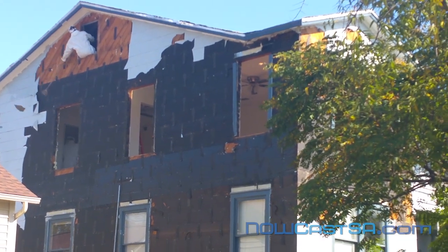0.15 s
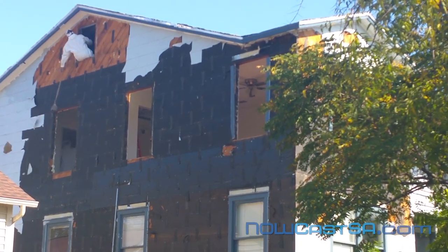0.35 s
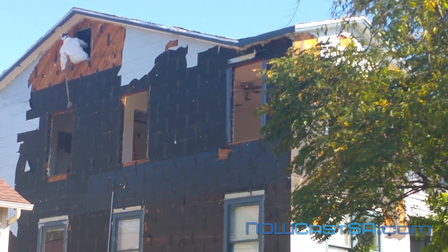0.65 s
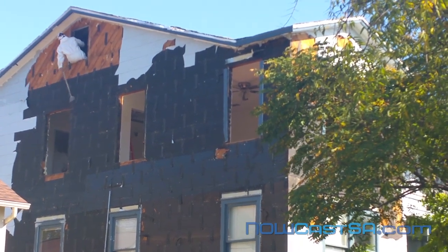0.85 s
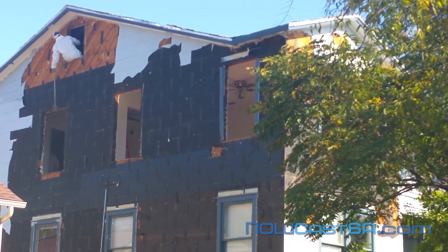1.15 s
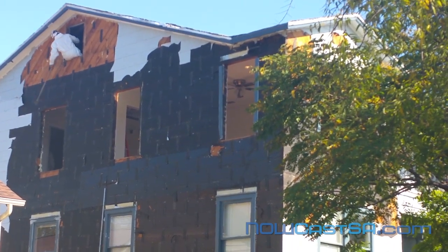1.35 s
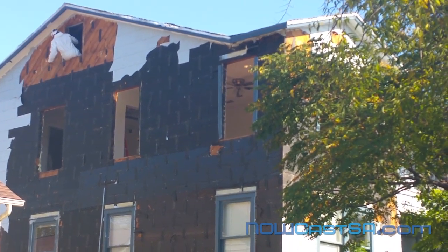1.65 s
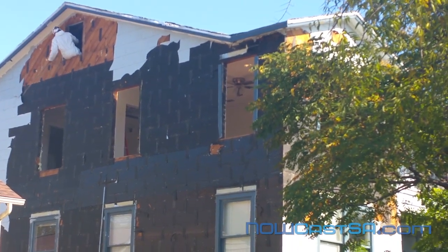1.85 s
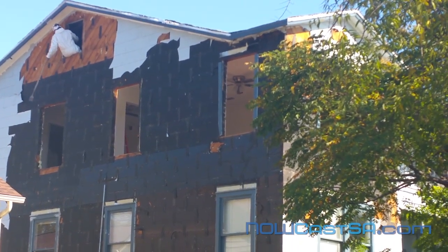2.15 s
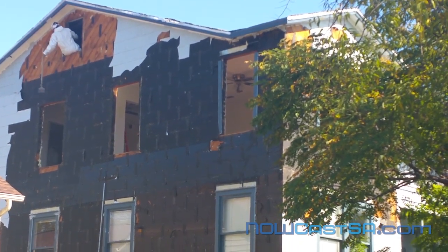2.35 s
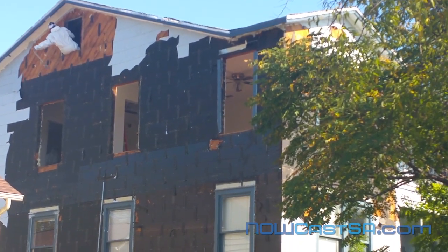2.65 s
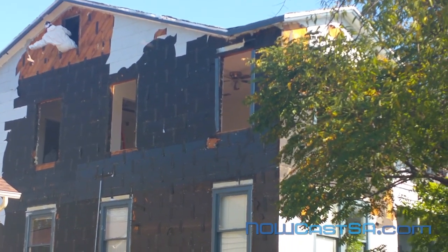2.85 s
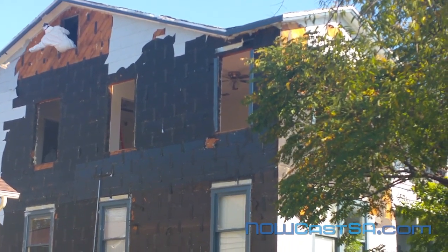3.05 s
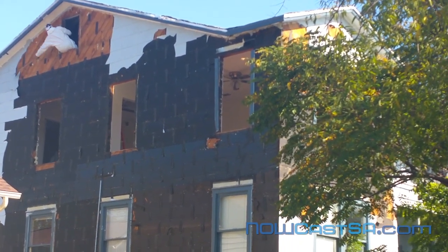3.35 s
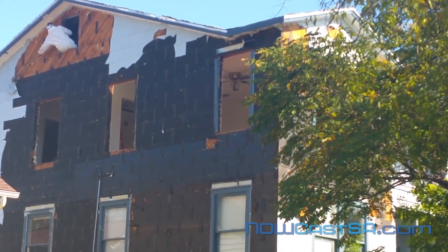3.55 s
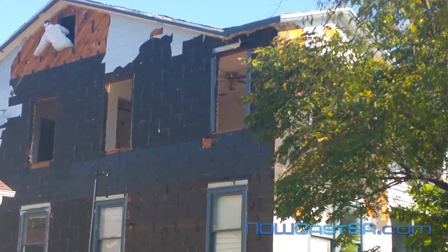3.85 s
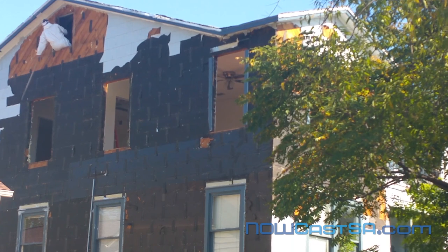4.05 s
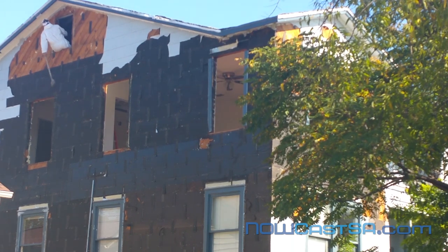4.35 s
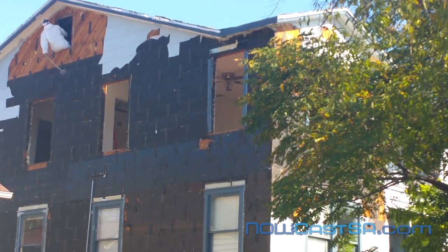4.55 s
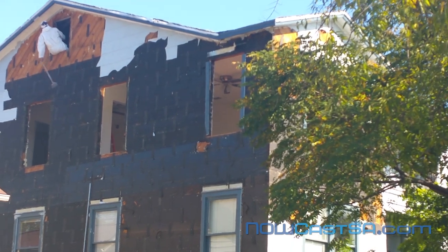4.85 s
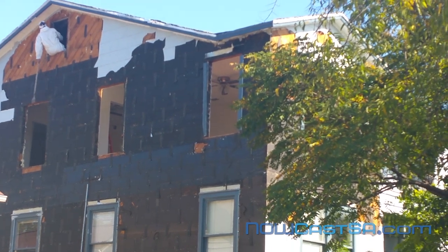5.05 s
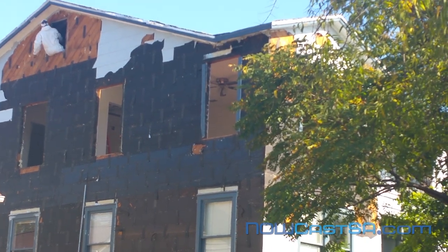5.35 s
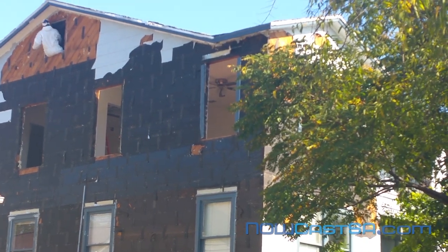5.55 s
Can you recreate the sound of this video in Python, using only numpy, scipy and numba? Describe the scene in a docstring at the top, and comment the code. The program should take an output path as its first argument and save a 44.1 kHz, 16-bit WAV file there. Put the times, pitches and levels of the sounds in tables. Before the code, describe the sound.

Hard shingles smash in uneven bursts in a yard, their shards clinking and tumbling over a faint traffic and engine hum.

```python
"""A yard, across from a house wall: brittle cement shingles are knocked off and shatter on the ground.
Each fall is a shower of shards, each a damped ring, then a tumbling heap and trickling crumbs.
A whole shingle and single chips ring, dust sizzles, heavy loads thud; the yard's walls answer.
Far traffic and a faint engine sink under the crashes. A thin hiss stays; a breathy band swells at the end."""
import sys
import numpy as np
from scipy import signal
from scipy.fft import rfft, irfft, next_fast_len
from scipy.io import wavfile
from scipy.ndimage import uniform_filter1d, map_coordinates
from numba import njit

SR = 44100
rng = np.random.default_rng(int(sys.argv[2]) if len(sys.argv) > 2 else 0)


def log_audio(samples):
    """Write samples as a 16-bit WAV file to the path given in sys.argv[1]."""
    # one column per channel
    frames = np.atleast_2d(samples).T
    # limit to full scale, then quantise
    limited = np.clip(frames, -1, 1)
    pcm = np.round(limited * 32767).astype(np.int16)
    wavfile.write(sys.argv[1], SR, pcm)


N = 252187

# Impacts and cracks. Each row: start in seconds, middle pieces in dB, big pieces and splinters
# in dB relative to those, middle pitch in Hz.
IMPACTS = [(0.0275, -22, -13, -36, 2110), (0.0478, -12, -18.5, -44, 1540), (.058, -7.5, -44, -39, 1510),
           (0.2305, -19.5, -38, -7, 2940), (0.2473, -16.5, -19.5, -13.5, 2990),
           (0.3186, -46, -15, -6.5, 1760), (0.361, -31.5, -37, -39, 3270), (.822, -37, -11, -38, 2570),
           (1.0472, -5.5, -33, -14, 2020), (1.1274, -16.5, -8, -10, 1510),
           (1.2303, -12.5, -22, -15.5, 2530), (1.4396, -5, -32, -12.5, 1830), (1.4844, -10, -33, -32, 1600),
           (1.7115, -27, -8, -31, 2500), (1.7624, -36.5, -8, -13.5, 2860), (2.0463, -36.5, -2, -14, 2250),
           (2.2008, -49, -6, -4, 2900), (2.3815, -14, -42, -10, 1555), (2.4051, -26, -49.5, 2, 1435),
           (2.8024, -49, -10, 5.5, 2300), (3.3388, -38.5, -19, -40, 1550), (3.5427, -3.5, -12, -19, 1560),
           (3.5778, -11, -11, -26, 1810), (3.6755, -12, -8.5, -29, 2040), (3.7631, -18.5, -24, -36, 2040),
           (3.8694, -45, 0, -39, 1500), (4.4367, -42, -1, -9, 1840), (4.6837, -20, -33, 4.5, 2430),
           (4.7005, -13.5, -33, -6.5, 2970), (4.7455, -13, -16, -21.5, 2117),
           (4.9821, -54.5, -25, -27, 2540), (5.1937, -11.5, -32, -13, 1920), (5.2154, -19, -41, -27, 2610)]
# Big, middle, splinter. Each row: nominal pitch in Hz, spread in octaves, nominal cycles to -40 dB,
# shower gain in dB, factor on shower t60.
SHARD_SIZES = [(599, 0.4, 7, 10, 1.05), (2216, 0.466, 10.5, -5, .95), (6630, 0.54, 63, 1, .8)]
# Tumbling rubble, one table a heap. Each row: time in seconds, middle pieces, big pieces and
# splinters in dB, middle pitch in Hz.
HEAPS = [
    [(0.06, -70, -40, -43, 1500), (0.07, -26.5, -43, -56, 1510), (0.098, -53, -49, -83, 1530),
     (0.138, -64, -72, -78, 1760), (0.16, -44, -64, -55, 1880)],
    [(0.25, -3, -50, -35, 2410), (0.26, -27, -49, -27.5, 2540), (0.272, -28, -58, -29, 2420),
     (0.3, -49, -57, -54, 2460), (0.312, -45, -73, -56, 2380), (0.326, -44, -56, -41, 2230),
     (0.34, -47, -72, -57, 2170)],
    [(0.37, -42, -44, -45, 2240), (0.382, -36.5, -36, -48, 2220), (0.414, -39.5, -39, -53, 2230),
     (0.448, -51, -63, -59, 2420), (0.456, -46, -59, -65, 2480), (0.52, -56, -69, -64, 2060)],
    [(0.83, -73, -47, -72, 2500), (0.834, -39, -44, -123, 2400), (0.876, -49, -40, -79, 2340),
     (0.896, -47.5, -46, -76, 2230), (0.934, -46.5, -39, -96, 2000), (0.97, -59.5, -45, -78.5, 1900),
     (1.0, -65, -40, -73, 2050)],
    [(1.055, -16.5, -29, -28.5, 2020), (1.079, -20.5, -27, -22, 1950), (1.101, -16.5, -35, -23, 1910),
     (1.129, -18.5, -46, -22, 1870), (1.139, -23.5, -36, -31, 1800), (1.207, -29, -36, -37.5, 2200),
     (1.225, -38.5, -43, -40.5, 2220)],
    [(1.24, -19.5, -45, -28.5, 2010), (1.272, -23.5, -35, -25.5, 1930), (1.304, -9.5, -23, -22.5, 1823),
     (1.32, -16, -26, -21.5, 1920), (1.392, -40, -51, -47, 2300), (1.412, -39.5, -73, -57, 2240),
     (1.43, -31, -59, -52, 2180)],
    [(1.455, -11, -33, -20.5, 1746), (1.467, -11.5, -27, -18, 1704), (1.495, -25.5, -27.5, -21.5, 1830),
     (1.525, -16, -44, -27, 1870), (1.543, -27, -33, -28, 1780), (1.567, -30.5, -44, -35.5, 2160),
     (1.7, -33.5, -52, -46, 2800)],
    [(1.77, -43, -53, -61, 2760), (1.798, -37, -57, -45, 2420), (1.816, -32, -64, -50, 2270),
     (1.85, -38.5, -35.5, -72, 2600), (1.878, -42.5, -54, -51, 2700), (1.916, -39.5, -46, -54, 2610),
     (1.97, -65, -56, -71, 2700)],
    [(2.42, -53, -49, -24, 1450), (2.43, -50, -73, -47, 1520), (2.472, -32, -44, -63, 1720),
     (2.508, -28.5, -27, -55, 1555), (2.574, -46.5, -42.5, -66, 1820), (2.608, -38, -41, -68, 2280),
     (2.65, -60, -59, -62, 2470)],
    [(3.555, -23, -16, -30, 1920), (3.579, -12, -21, -24.5, 1894), (3.597, -24, -29, -31, 1870),
     (3.623, -20.5, -24, -35, 2030), (3.657, -33.5, -57, -45, 1840), (3.66, -26, -43, -45, 1840)],
    [(3.66, -35, -27, -43, 2320), (3.666, -25, -25, -42, 2360), (3.686, -25, -24.5, -43, 2350),
     (3.732, -36.5, -39, -48, 2000), (3.77, -26, -41, -46, 2270), (3.818, -54, -72, -68, 2010),
     (3.84, -41, -72, -63, 2030)],
    [(3.85, -60, -71, -65, 1570), (3.886, -47, -76.5, -62, 2500), (3.948, -51, -69, -62, 1860),
     (4.046, -53.5, -62, -62, 1480), (4.092, -55, -76, -64, 1550), (4.118, -54, -53, -70, 1610),
     (4.14, -59, -61, -83, 1540)],
    [(4.72, -45, -36, -26, 2400), (4.75, -21, -20.5, -26, 2200), (4.782, -16, -27.5, -24, 1890),
     (4.798, -25, -23, -22, 2100), (4.81, -12.5, -14.5, -25.5, 1950), (4.846, -16.5, -17, -21.5, 1900),
     (4.94, -35.5, -40, -49, 1930)],
    [(4.94, -43, -50, -56, 2360), (4.96, -30, -52, -56.5, 2600), (5.014, -44, -58, -40, 2560),
     (5.078, -33, -35, -38, 2460), (5.144, -48.5, -52, -45, 2360), (5.18, -75, -28, -75, 1840)],
    [(5.21, -21, -51, -35, 2220), (5.218, -22, -41, -33.5, 2200), (5.252, -31.5, -50, -36, 2080),
     (5.266, -34, -39, -57, 2090), (5.31, -43.5, -41, -71, 2270), (5.338, -52, -55, -70, 2470),
     (5.36, -41, -56, -63, 2410)],
    [(5.48, -62, -39, -73, 1380), (5.51, -50, -40, -63, 1380), (5.528, -51, -52, -63, 1390),
     (5.62, -43, -46, -51, 1740), (5.654, -48, -41, -72, 1540), (5.664, -58, -49, -74, 1490),
     (5.68, -57, -35, -81, 1470)],
]
# Trickling crumbs. Each row: time in seconds, middle pieces in dB, splinters in dB.
CRUMB_LEVELS = [(0.0, -47, -55), (0.19, -57, -64), (0.76, -63.5, -65.5), (1.1, -58, -60),
                (1.23, -25.5, -34), (1.43, -31, -45), (1.74, -43.5, -59), (2.05, -67, -66),
                (3.44, -61.5, -72.5), (3.74, -36.5, -60), (4.17, -74, -78), (4.73, -59, -67),
                (4.86, -38.5, -33), (5.06, -32, -52), (5.32, -52, -64), (5.72, -59, -75)]
# Modes of a whole shingle. Each row: frequency in Hz, level in dB, t60 in seconds.
SHINGLE_MODES = [(1449, 5.5, 0.091), (2000, -7.5, 0.061), (2167, -17, 0.059), (2576, -6, 0.15),
                 (3190, -6.5, 0.061), (3820, -11.5, 0.14), (4610, -20, 0.19), (6600, -45, 0.095),
                 (7450, -24.5, 0.085)]
# Strikes on it. Each row: start in seconds, level in dB.
SHINGLE_HITS = [(2.3863, -14), (2.4041, -14)]
# One-note chips. Each row: start in seconds, level in dB, pitch in Hz.
CHIP_NOTES = [(.014, -30, 365), (.0278, -25, 1845), (.0423, -31.5, 7670), (.0478, -12, 1500),
              (.0583, -16.5, 3440), (.0595, -28, 4480), (.0672, -20.5, 3320), (.0682, -9.5, 1524),
              (.2299, -21, 3010), (.2473, -31, 2200), (.834, -38.5, 2420), (1.1268, -17.5, 7130),
              (1.7983, -30.5, 2500), (1.7998, -29.5, 1890), (1.8577, -29.5, 3110), (1.9144, -29, 2516),
              (1.9599, -40, 3230), (2.0457, -40.5, 2100), (2.0457, -40.5, 3940), (2.0497, -39.5, 2845),
              (2.2009, -40.5, 3300), (2.2129, -45, 4800), (2.2194, -41.5, 3290), (2.8095, -34, 6950),
              (2.8928, -46, 4660), (2.8933, -47, 6860), (3.669, -20, 700), (3.869, -36, 660),
              (3.8816, -41, 2570), (3.907, -49, 6700), (4.0287, -49, 4840), (4.0482, -50, 4050),
              (4.4533, -43.5, 3730), (5.0449, -30, 5100), (5.0894, -31, 5210), (5.1934, -16, 1978),
              (5.3527, -38, 4680), (5.3762, -41, 4660), (5.3762, -43, 7400)]
# Thuds in the soil; treble rustles. Each row: start in seconds, hold in seconds, level in dB.
SOIL_THUDS = [(0.024, 0.035, -48.5), (1.3, .03, -52), (3.558, .04, -46), (4.81, 0.048, -40)]
HISS_RUSTLES = [(0.124, 0.053, -59), (0.197, 0.01, -55), (.28, .05, -50), (1.752, 0.023, -57),
                (2.8, 0.024, -61), (2.885, 0.035, -60), (3.977, 0.11, -62), (5.534, .11, -60)]
# Wall reverberation. Each row: frequency in Hz, t60 in seconds.
YARD_DECAY = [(300, 0.057), (2000, 0.17), (8000, 0.19), (15000, 0.027)]
# Far road. Each row: time in seconds, rumble in dB, tyres in dB.
TRAFFIC_LEVELS = [(0.0, -69, -68), (0.29, -55, -53), (0.59, -50, -59), (0.81, -66, -52), (1.05, -67, -53.5),
                  (1.31, -81, -48), (1.64, -53.5, -52.5), (1.88, -51, -48), (2.34, -52, -56),
                  (2.79, -70.5, -54.5), (3.41, -59, -51), (3.71, -66, -53.5), (4.14, -67, -52),
                  (4.47, -63, -54.5), (4.94, -48.5, -45.5), (5.72, -63, -48)]
# Engine swells. Each row: start in seconds, hold in seconds, note in dB, overtones in dB.
ENGINE_SWELLS = [(0, 0.093, -68, -51), (0.383, .4, -45.5, -73), (1.007, .05, -62, -77),
                 (1.245, 0.082, -48.5, -58), (1.657, 0.061, -45.5, -55.5), (1.842, 0.057, -46.5, -55),
                 (1.937, 0.425, -63, -50.5), (3.41, 0.084, -68, -67), (3.993, 0.16, -72, -63),
                 (4.955, .3, -56, -66)]
# Breathy band. Each row: time in seconds, level in dB, centre in Hz.
WHOOSH_PATH = [(5.3, -42, 1070), (5.36, -43, 1100), (5.42, -44, 1125), (5.5, -35.5, 1111),
               (5.62, -47, 1089), (5.64, -35, 1096), (5.68, -34.5, 976), (5.72, -33, 947)]
# Source spectra and microphone response. Each row: frequency in Hz, relative gain in dB.
SHARD_EQ = [(200, -18), (500, -10), (1000, -0.14), (2000, 3.5), (4000, 3.5), (7000, 1.5), (10000, -8.5),
            (15500, 0)]
DUST_EQ = [(7000, -41.5), (8500, 3.5), (10000, 1.5), (12500, -8), (15800, -15)]
SOIL_EQ = [(80, -42.5), (150, -7), (250, 3.5), (400, -5.5), (700, -43)]
RUMBLE_EQ = [(15, -64.5), (25, -40), (59, -3), (92, -11.5), (119, 0.5), (190, -8), (300, -3.5),
             (390, -21.5), (660, -120)]
TYRE_EQ = [(120, -17.5), (200, -3), (315, -4), (450, -6.5), (633, -5), (1350, -10), (1600, -5.5),
           (2520, -19.5), (6000, -59), (7800, -60.5), (13200, -120)]
HISS_EQ = [(1470, -35), (2500, -12.5), (2830, 5.5), (3060, -5), (3330, 1), (4930, -5), (5450, -9),
           (6610, 0.5), (8020, -14), (11300, -5.5), (14400, -18.5), (15800, -23.5)]
MIC_EQ = [(20, -19.5), (60, -10.5), (100, -0.5), (150, -0.5), (16000, -1)]
# Balance of shards and of far noise. Each row: frequency in Hz, left minus right in dB.
SHARD_PAN = [(60, 3.0), (95, 3.0), (150, 3.0), (240, -7.5), (380, 5.5), (600, -1.5), (950, 3), (1500, -1),
             (2380, 15), (3770, 5), (5980, -7), (9470, 8), (15000, 0)]
FAR_PAN = [(60, -4), (150, 4.5), (380, 2), (950, 11), (2380, 9), (5980, 4), (15000, 1)]
# Width of far noise. Each row: frequency in Hz, left-right correlation.
FAR_CORRELATION = [(60, 0.69), (180, 1), (550, 0.3), (1650, -0.37), (4970, 0.059), (15000, 0.12)]

SHOWER_RISE_S, SHOWER_T60_S, CHIP_T60_S = .0013, .12, .052
BIG_CRUMBS_DB, HISS_DB = -45, -68.5
DUST_GAIN_DB, DUST_DB_PER_DB = 0.5, 1.638
ENGINE_HZ, IDLE_NOTE_DB, IDLE_OVERTONES_DB = 162.5, -64, -68
DUCK_FROM_DB, DUCK_DB_PER_DB, DUCK_TAU_S = -34, 0.53, 0.057
TOP_HZ = 15850


def shatter(strikes=170, pieces=40):
    """Each impact throws pieces of three sizes that strike repeatedly as the shower thins."""
    start_s, db, big_db, splinter_db, middle_hz = np.transpose(IMPACTS)[:, :, None]
    out = 0
    shifts = (1, middle_hz / SHARD_SIZES[1][0], 1)
    for size, relative_db, shift in zip(SHARD_SIZES, (big_db, 0, splinter_db), shifts):
        hz, octaves, cycles, size_db, t60_factor = size
        which, when = rng.random((len(IMPACTS), strikes, 2)).transpose(2, 0, 1)
        scatter = np.maximum(rng.standard_normal((len(IMPACTS), pieces)), -1.2)
        piece_hz = hz * shift * 2 ** (octaves * scatter)
        strike_hz = np.take_along_axis(piece_hz, (which * pieces).astype(int), axis=1)
        t60_s = t60_factor * SHOWER_T60_S
        span_s = t60_s / 2 + SHOWER_RISE_S
        t = span_s * when ** 1.5
        rise_db = 20 * np.log10(1.02 - np.exp(-t / SHOWER_RISE_S))
        # Early strikes crowd, so each carries less level.
        spacing_db = 10 * np.log10(span_s * SR / strikes * 1.5 * np.sqrt(when + .02))
        decay_db = 60 * t / t60_s * (strike_hz / (hz * shift)) ** 0.15  # small pieces settle first
        level_db = db + relative_db + size_db + rise_db + spacing_db - decay_db
        out += shards(start_s + t, strike_hz, level_db, cycles, uneven_db=2)
    return out


def rubble(strikes=450, pieces=60):
    """Heaps tumble in clumps, pitch and size mix drifting; pieces ring longer than on impact."""
    out, clumps = 0, wobble(70)
    for column, (hz, octaves, cycles, *_) in zip((2, 1, 3), SHARD_SIZES):
        which, when = rng.random((2, len(HEAPS), strikes))
        spread = 2 ** (octaves * np.maximum(rng.standard_normal((len(HEAPS), pieces)), -1.5))
        start_s, strike_hz, level_db = np.zeros((3, len(HEAPS), strikes))
        for k, heap in enumerate(map(np.transpose, HEAPS)):
            knots_s = heap[0]
            span_s = knots_s[-1] - knots_s[0]
            start_s[k] = knots_s[0] + span_s * when[k]
            centre_hz = np.interp(start_s[k], knots_s, heap[4]) if column == 1 else hz
            strike_hz[k] = centre_hz * spread[k, (which[k] * pieces).astype(int)]
            spacing_db = 10 * np.log10(span_s * SR / strikes)
            level_db[k] = np.interp(start_s[k], knots_s, heap[column]) + spacing_db
        level_db += 2.2 * clumps[(start_s * SR).astype(int)]
        out += shards(start_s, strike_hz, level_db, 1.5 * cycles, uneven_db=2)
    return out


def crumbs(strikes=20000):
    """Small bits slide and drop throughout: a dense wash of short rings."""
    out = 0
    for (hz, octaves, cycles, *_), db in zip(SHARD_SIZES, (BIG_CRUMBS_DB, *curves(CRUMB_LEVELS))):
        start_s = rng.random(strikes) * (N - 1) / SR
        strike_hz = hz * 2 ** (1.2 * octaves * rng.standard_normal(strikes))
        wash_db = db + 1.7 * wobble(25)
        level_db = wash_db[(start_s * SR).astype(int)] + 10 * np.log10(N / strikes)
        out += shards(start_s, strike_hz, level_db, 0.51 * cycles, uneven_db=1)
    return out


def shards(start_s, hz, db, cycles, uneven_db):
    """One damped stereo ring per landing, with random strength, pan, delay and life."""
    strength = rng.exponential(size=start_s.shape)
    lean, lag, life = rng.standard_normal((3,) + start_s.shape)
    step_rad = 2 * np.pi * np.clip(hz, 200, 15500) / SR
    decay = step_rad / (2 * np.pi) * np.log(100) / (cycles * np.exp(.3 * life))  # nepers per sample
    pan_db = (along(SHARD_PAN, hz) + 2 * lean) / 2
    db = db - 20 * np.clip(np.log2(hz / 8000), 0, 2)  # the finest bits barely carry this far
    db = db + uneven_db * (np.minimum(strength, 4) - 2.5)
    gain = amp(db + np.array([pan_db, -pan_db])) * np.sqrt(4 * decay)
    lag_samples = np.clip(7 + 3 * lag, -40, 40).ravel()
    start_samples = np.clip(start_s * SR, 40, N).ravel()
    out = np.zeros((2, N))
    add_rings(out, start_samples, step_rad.ravel(), gain.reshape(2, -1), decay.ravel(), lag_samples)
    return out


@njit
def add_rings(out, start_samples, step_rad, gain, decay, lag_samples):
    """Damped sines rising over about one cycle, right channel offset by the lag."""
    for i in range(len(start_samples)):
        pole, onset_pole = np.exp(-decay[i] + 1j * step_rad[i]), np.exp(-step_rad[i] / 4)
        phasor, onset = 1 + 0j, 1.0
        left, right = int(start_samples[i]), int(start_samples[i] + lag_samples[i])
        for k in range(min(int(4 / decay[i]), out.shape[1] - max(left, right))):
            ring = phasor.imag * (1 - onset)
            out[0, left + k] += gain[0, i] * ring
            out[1, right + k] += gain[1, i] * ring
            phasor *= pole
            onset *= onset_pole


def ringing_pieces():
    """A whole shingle rings in its modes, chips in one note; rattling on rubble blurs the phase."""
    out, t = np.zeros((2, N + SR)), np.arange(SR // 4) / SR
    modes = [(start_s, hit_db + mode_db, hz, t60_s)
             for start_s, hit_db in SHINGLE_HITS for hz, mode_db, t60_s in SHINGLE_MODES]
    chips = [(*row, CHIP_T60_S) for row in CHIP_NOTES]
    for start_s, db, hz, t60_s in modes + chips:
        pan_db = along(SHARD_PAN, hz) * np.array([[.5], [-.5]])
        drift = uniform_filter1d(np.cumsum(rng.standard_normal(len(t))), size=60)
        rattle_rad = drift * .0022 * np.sqrt(hz)
        phase_rad = rng.normal(0, 0.66, (2, 1)) + rattle_rad
        envelope = amp(db + pan_db - 60 * t / t60_s) * (1 - np.exp(-t / 0.0007))
        out[:, round(start_s * SR):][:, :len(t)] += envelope * np.sin(2 * np.pi * hz * t + phase_rad)
    return out[:, :N]


def dust(debris):
    """Dust sizzles, following the splinter band of each crash."""
    splinters = filtered(debris, lambda hz: (hz > 5000) & (hz < 9000))
    envelope = running_rms(splinters, tau_s=.006) ** DUST_DB_PER_DB
    return amp(DUST_GAIN_DB) * envelope * far_noise(DUST_EQ, patchy_db=5)


def thuds():
    """Heavy loads hit the soil: short pushes of low noise."""
    start_s, hold_s, db = np.transpose(SOIL_THUDS)[:, :, None]
    soil = unit_rms(equalised(rng.standard_normal(N), SOIL_EQ))
    return swells(start_s, hold_s, db, edge_s=0.02) * soil


def yard_walls(x, delay_samples=300):
    """Wall reflections: a noise tail, each frequency with its own decay."""
    hz, t, spectrum = signal.stft(rng.standard_normal((2, SR // 2)), SR, nperseg=256)
    tail = signal.istft(spectrum * amp(-60 * t / along(YARD_DECAY, hz)[:, None]), SR, nperseg=256)[1]
    delayed = np.pad(x, ((0, 0), (delay_samples, 0)))
    return signal.fftconvolve(delayed, tail / np.linalg.norm(tail[0]), axes=1)[:, :N]


def traffic():
    """Far rumble and tyre roar, wavering independently."""
    rumble_db, tyres_db = curves(TRAFFIC_LEVELS)
    rumble = amp(rumble_db + 2.5 * wobble(12)) * far_noise(RUMBLE_EQ, patchy_db=2)
    tyres = amp(tyres_db + 1.5 * wobble(10)) * far_noise(TYRE_EQ, patchy_db=3)
    return rumble + tyres


def engine(edge_s=0.039):
    """A far engine's note and two overtones throb and swell above idle."""
    start_s, hold_s, note_db, overtones_db = np.transpose(ENGINE_SWELLS)[:, :, None]
    note_gain = amp(IDLE_NOTE_DB) + swells(start_s, hold_s, note_db, edge_s)
    overtone_gain = amp(IDLE_OVERTONES_DB) + swells(start_s, hold_s, overtones_db, edge_s)
    hz = ENGINE_HZ * (1 + 0.012 * wobble(5.3) + 0.03 * wobble(30))
    phase_rad = 2 * np.pi * np.cumsum(hz) / SR
    note = note_gain * amp(4.5 * wobble(20)) * np.sin(phase_rad)
    partials = np.sin(2 * phase_rad) + amp(-5) * np.sin(2.5 * phase_rad)
    overtones = overtone_gain * amp(3 * wobble(22)) * partials
    return (note + overtones) * amp([[1.6], [-1.6]])


def whoosh(half_width_hz=110, rise_s=0.029):
    """A narrow, breathy noise band swells at the end."""
    db, centre_hz = curves(WHOOSH_PATH)
    slow = filtered(rng.standard_normal((2, 2, N)), lambda hz: 1 / (1 + (hz / half_width_hz) ** 2))
    phase_rad = 2 * np.pi * np.cumsum(centre_hz) / SR
    band = unit_rms(slow[0] * np.cos(phase_rad) + slow[1] * np.sin(phase_rad))
    fade_in = np.clip((np.arange(N) / SR - WHOOSH_PATH[0][0]) / rise_s, 0, 1)
    return fade_in * amp(db + np.array([[3], [-1]])) * band


def hiss():
    """Thin far hiss with brief rustles."""
    start_s, hold_s, db = np.transpose(HISS_RUSTLES)[:, :, None]
    envelope = amp(HISS_DB) + swells(start_s, hold_s, db, edge_s=.012)
    return envelope * far_noise(HISS_EQ, patchy_db=3.5)


def far_noise(eq, patchy_db):
    """Stereo noise, gain patchy in time and frequency; unit rms in mono."""
    spectrum = signal.stft(rng.standard_normal((2, N)), nperseg=512)[2]
    patches = uniform_filter1d(uniform_filter1d(rng.standard_normal(spectrum.shape[1:]), 6, 0), 10, 1)
    pair = signal.istft(spectrum * amp(patchy_db * unit_rms(patches)), nperseg=512)[1][:, :N]
    wide = far_stereo(equalised(pair, eq))
    return wide / np.std(wide.mean(0))


def far_stereo(pair):
    """Mixes two independent noises to the far correlation and balance."""
    def mid_side_gains(hz):
        angle_rad = np.arccos(along(FAR_CORRELATION, hz)) / 2
        return np.array([np.cos(angle_rad), np.sin(angle_rad)])
    mid, side = filtered(pair, mid_side_gains)
    return filtered(np.array([mid + side, mid - side]), lambda hz: amp(along(FAR_PAN, hz) * [[.5], [-.5]]))


def swells(start_s, hold_s, db, edge_s):
    """Sum of rise-hold-fall gain curves."""
    t = np.arange(N) / SR
    ramps = np.clip(np.minimum(t - start_s, start_s + hold_s - t) / edge_s + 1, 0, 1)
    return np.sum(amp(db) * ramps ** 2, axis=0)


def running_rms(x, tau_s):
    """Rms of both channels, one-pole smoothed."""
    pole = np.exp(-1 / (tau_s * SR))
    return np.sqrt(signal.lfilter([1 - pole], [1, -pole], np.mean(x ** 2, axis=0)) + 1e-12)


def wobble(rate_hz):
    """Smooth random curve, rate_hz knots a second."""
    return map_coordinates(rng.standard_normal(int(N * rate_hz / SR) + 4), [np.arange(N) * rate_hz / SR])


def curves(rows):
    """Per-sample curve for each column after the time."""
    knots_s, *columns = np.transpose(rows)
    return [np.interp(np.arange(N) / SR, knots_s, column) for column in columns]


def along(points, hz):
    """Interpolates (Hz, value) points on a log axis."""
    knots_hz, values = np.transpose(points)
    return np.interp(np.log(hz + 1), np.log(knots_hz + 1), values)


def filtered(x, response):
    """FFT filter with gain response(hz)."""
    size = next_fast_len(N + SR // 2)
    return irfft(rfft(x, size) * response(np.fft.rfftfreq(size, 1 / SR)), size)[..., :N]


def equalised(x, eq):
    return filtered(x, lambda hz: amp(along(eq, hz)))


def amp(db):
    return 10 ** (np.asarray(db) / 20)


def unit_rms(x):
    return x / np.sqrt(np.mean(x ** 2) + 1e-20)


def scene():
    """Debris and its reflections over the background; traffic and engine duck under crashes."""
    debris = equalised(shatter() + rubble() + crumbs(), SHARD_EQ) + ringing_pieces()
    over_db = np.maximum(20 * np.log10(running_rms(debris, DUCK_TAU_S)) - DUCK_FROM_DB, 0)
    far = amp(-DUCK_DB_PER_DB * over_db) * (traffic() + engine())
    return debris + amp(-12) * yard_walls(debris) + dust(debris) + hiss() + far + whoosh() + thuds()


def record(dry):
    """Soft clip, bass cut, band limit."""
    rounded = dry / (1 + np.abs(dry / .9) ** 4) ** .25
    return filtered(rounded, lambda hz: amp(along(MIC_EQ, hz)) * (hz < TOP_HZ))


dry = scene()
out = record(dry)
log_audio(out)
```